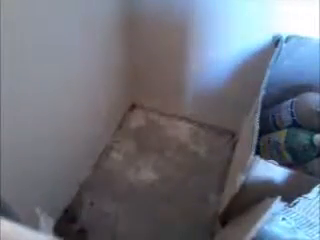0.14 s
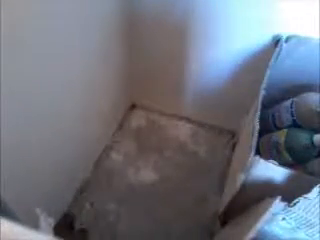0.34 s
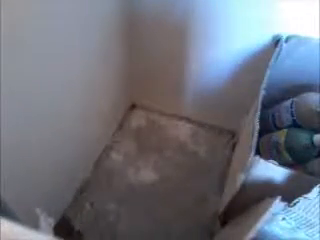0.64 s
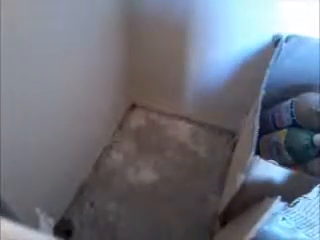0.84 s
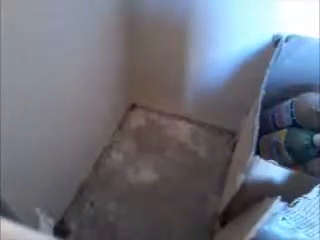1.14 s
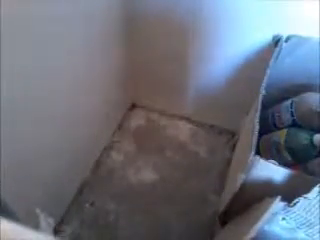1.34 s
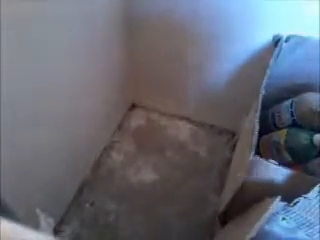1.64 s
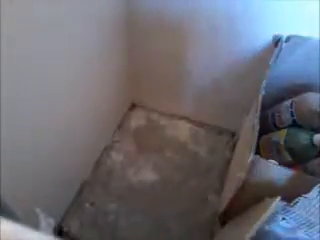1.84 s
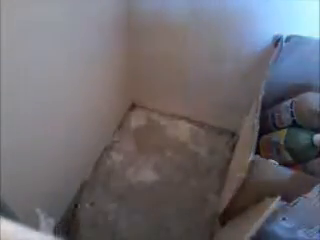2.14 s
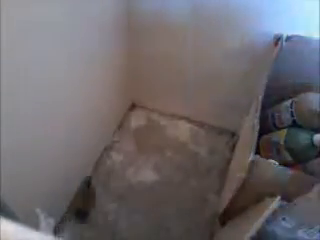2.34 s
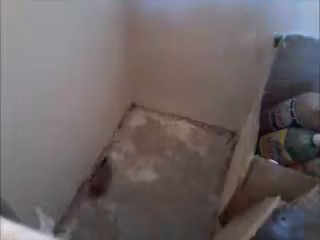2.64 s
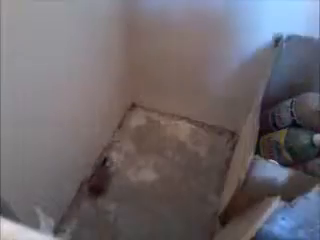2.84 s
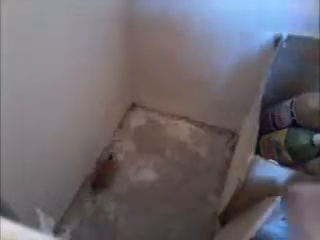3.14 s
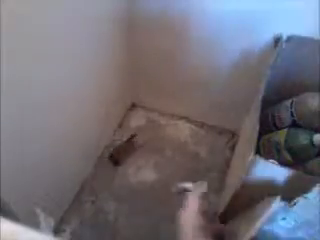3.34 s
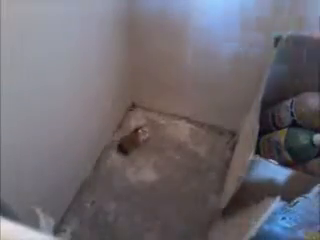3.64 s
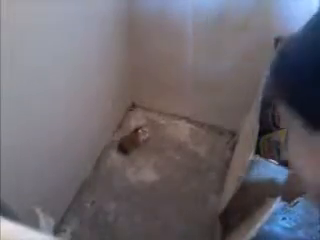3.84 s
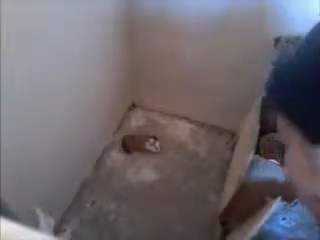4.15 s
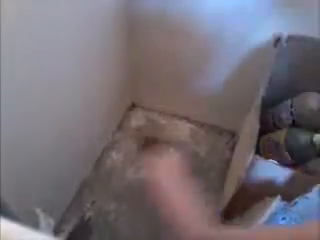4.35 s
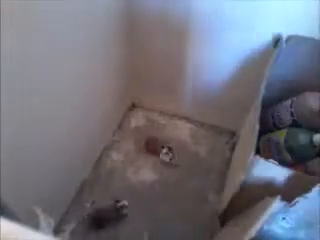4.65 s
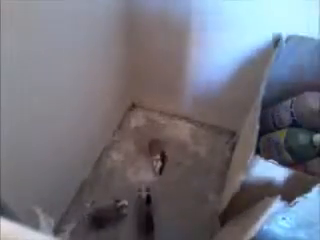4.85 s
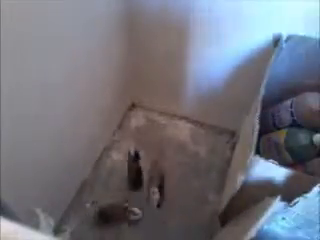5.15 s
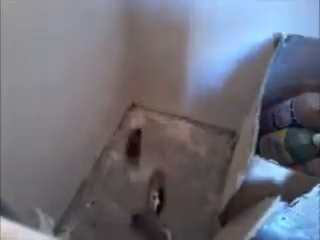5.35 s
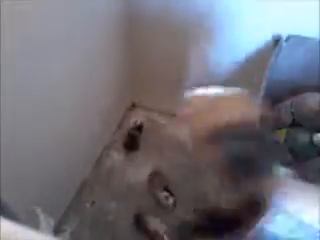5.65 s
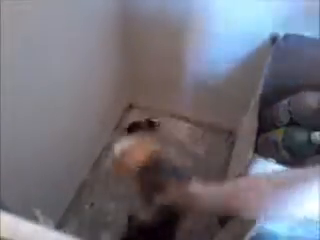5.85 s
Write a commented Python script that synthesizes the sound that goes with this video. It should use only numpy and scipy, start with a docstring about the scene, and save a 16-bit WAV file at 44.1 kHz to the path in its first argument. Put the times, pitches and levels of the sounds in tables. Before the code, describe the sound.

A small bare pen with hard walls, heard through a cheap, uneven microphone with soft air hiss. In the first 1.7 seconds young guinea pigs give faint thin peeps and short chirps around 1 kHz, with light grainy scuffs and soft low bumps. From about 1.8 seconds the chirps come in quick succession, each flipping up into a little whistle, with a bright burst of rustle near 2.25. Around 2.9, 3.25 and 3.45 seconds three shrill squeals sweep steeply up to about 7 kHz, by far the loudest sounds, slightly distorted and ringing off the walls. A few chirps follow until 3.9. A distant motor, emerging from about 2.7 seconds, now stands out as a drone with a rapid throb, under sparse weak peeps near 4.1 to 4.4. From 5.3 seconds handling rustles and scuffs return with blips near 5.5, and a sharp cardboard click lands at 5.8.

```python
"""A bare concrete pen with hard walls, young guinea pigs calling; thin peeps and quick blips, faint to loud.
Calls are stacks of unsteady partials: chirps near 1 kHz, rising whistles, glides that end in loud squeals.
Scuffs and breathy rushes are swells of noise grains; clicks ring cardboard modes; low noise bumps; air hisses.
From the middle on a distant motor drones, and a fast throb of noise puffs rings a pipe.
Dense wall echoes follow the calls and taps; a small, uneven microphone bends the loudest squeals."""
import sys
import numpy as np
from scipy import signal
from scipy.fft import rfft, irfft
from scipy.io import wavfile
from scipy.ndimage import uniform_filter1d

SR = 44100
rng = np.random.default_rng(int(sys.argv[2]) if len(sys.argv) > 2 else 0)


def transcribe(signal):
    """Save signal, clipped to [-1, 1], as a 16-bit WAV file at the path in sys.argv[1]."""
    frames = np.atleast_2d(signal).T
    limited = np.clip(frames, -1, 1)
    pcm = np.round(limited * 32767).astype(np.int16)
    wavfile.write(sys.argv[1], SR, pcm)


N = 263718
TIME = np.arange(N) / SR  # s

# flat chirps, before the colour by frequency is applied: # t/s, length/s, start f/Hz, end f/Hz, fundamental
# level/dB, second partial level/dB
CHIRPS = [(0.0, 0.015, 1057, 1093, -42.5, -50.5), (0.25, 0.032, 1120, 1083, -53, -70),
          (0.808, 0.028, 840, 870, -59, -69), (0.846, 0.033, 943, 987, -47, -56.5),
          (1.118, 0.068, 799, 1116, -56, -55.5), (1.223, 0.03, 926, 969, -48, -57),
          (1.334, 0.043, 955, 1050, -54, -52), (1.425, 0.032, 973, 1032, -48.5, -51.5),
          (1.477, .027, 1160, 1160, -52.5, -67), (1.521, .04, 936, 1000, -47, -51.5),
          (1.761, 0.0376, 1414, 1540, -47, -64), (1.788, 0.039, 1156, 1157, -51.5, -61),
          (2.612, 0.046, 1074, 1201, -44.5, -48.5), (2.955, 0.023, 1137, 1204, -42, -53),
          (3.826, 0.04, 891, 956, -45.5, -56)]
# chirps that flip up into a whistle: t/s, flat length/s, start f/Hz, end f/Hz,
# fundamental level/dB, second partial level/dB, flip length/s, top f/Hz, flip level/dB
WHISTLES = [(1.855, 0.035, 1021, 1046, -49, -51, .046, 3430, -49.5),
            (1.965, .036, 1009, 982, -44.5, -49, 0.084, 5680, -50),
            (2.12, .032, 1206, 1126, -40.5, -45.5, .058, 4086, -40),
            (2.225, 0.067, 990, 1240, -44.5, -49.5, 0.04, 3500, -43),
            (2.322, 0.019, 1014, 1060, -44.5, -49, 0.016, 1700, -48),
            (2.38, 0.059, 980, 1195, -44, -47, 0.02, 2410, -48),
            (2.5, 0.036, 1084, 1194, -41.5, -44.5, 0.017, 1540, -53),
            (2.709, .036, 1155, 1226, -42, -47, 0.023, 2294, -41),
            (3.01, .036, 916, 966, -43.5, -48.5, 0.0216, 1540, -41),
            (3.339, 0.022, 1047, 1130, -42, -40, .02, 2100, -32.5),
            (3.556, 0.037, 957, 1014, -35.5, -43.5, 0.0242, 1300, -41),
            (3.675, 0.034, 932, 958, -43, -48, .028, 1115, -39)]
# loud squeals, one table a call: t/s, f/Hz, fundamental level/dB, second partial level/dB
SQUEALS = [
    [(2.83, 1017, -38.5, -37), (2.845, 1288, -42.5, -50.5), (2.86, 2855, -35.5, -56),
     (2.876, 4520, -45, -45.5), (2.896, 5620, -34, -37.5), (2.92, 5970, -30, -52),
     (2.932, 6480, -11.5, -32.5), (2.943, 6800, -26, -29), (2.956, 7050, -33, -44)],
    [(3.158, 1020, -42, -65), (3.185, 1576, -39, -42), (3.205, 2650, -39, -51.5), (3.225, 3690, -39.5, -33),
     (3.247, 5050, -32, -27.5), (3.259, 6076, -20, -18), (3.268, 6840, -11, -13), (3.282, 6930, -13, -23.5),
     (3.3, 7000, -12, -42.5)],
    [(3.38, 1900, -54, -51), (3.397, 2718, -40, -44.5), (3.41, 3240, -37, -35), (3.431, 4300, -35.5, -29.5),
     (3.448, 5390, -29.5, -25), (3.462, 6180, -17, -20), (3.476, 6840, -12, -20), (3.488, 7104, -9, -9.5),
     (3.5, 7108, -12.5, -25), (3.514, 7120, -11, -53.5)],
]
# colour each partial takes from its frequency: f/Hz, level/dB
PARTIAL_COLOUR = [(900, 0.5), (2000, -1), (3300, -3.5), (4600, 2), (5400, 0), (6200, 3), (7200, -1),
                  (9500, -0.5), (13500, 1), (16000, -3)]
# thin peeps and quick, mostly upward blips without overtones, faint to loud:
# t/s, length/s, start f/Hz, end f/Hz, level/dB
PEEPS = [(0.032, 0.027, 1523, 1830, -56.5), (0.083, 0.014, 730, 740, -56), (0.177, .025, 1190, 1220, -63.5),
         (0.336, 0.037, 790, 900, -60), (0.343, .025, 1500, 1440, -55.5), (.13, .025, 2130, 2140, -63),
         (.373, 0.031, 2110, 2100, -68), (.43, .045, 2020, 2060, -66), (0.474, 0.053, 2040, 2080, -68),
         (0.523, .035, 2040, 2060, -63), (0.406, 0.021, 800, 770, -57), (.61, .037, 1565, 1470, -59),
         (.73, .046, 1610, 1880, -60.5), (0.457, .025, 1620, 1840, -60.5), (.695, 0.03, 1150, 1150, -57.5),
         (0.971, 0.022, 740, 770, -59), (1.047, 0.015, 1190, 1200, -58), (1.475, 0.017, 2540, 2870, -54),
         (2.668, 0.013, 1750, 1970, -42), (2.698, .018, 1700, 1630, -52), (2.786, .016, 1310, 2160, -39),
         (2.81, 0.064, 3590, 3620, -55), (2.856, 0.029, 1196, 2210, -47.5), (3.194, 0.047, 1580, 1663, -45),
         (3.449, 0.018, 1394, 2520, -28), (3.482, .011, 3750, 3500, -40), (3.541, 0.015, 1425, 2170, -38),
         (3.696, 0.014, 2330, 2610, -47), (4.055, .021, 1274, 1406, -52.5),
         (4.111, 0.041, 1650, 1878, -48.5), (4.219, 0.021, 1870, 2014, -47),
         (4.378, 0.036, 1015, 1025, -49), (5.02, 0.023, 1750, 1796, -51.5), (3.715, 0.025, 1996, 2070, -49),
         (3.93, 0.11, 1500, 1478, -58), (5.485, 0.03, 1526, 1920, -49), (5.519, 0.036, 2370, 3200, -46.5),
         (5.555, .019, 1800, 2290, -65)]
# scuffs, and breathy rushes around the squeals: t/s, bright hiss level/dB, dull scrape level/dB, t60/s
SCUFFS_AND_RUSHES = [(.04, -82, -56.5, 0.088), (.2, -51.5, -78, .14), (.26, -77, -61, 0.071),
                     (.335, -79, -53, .12), (.63, -80, -54, 0.86), (0.693, -49, -47.5, 0.21),
                     (.86, -56, -55, 0.17), (1.05, -80, -54.5, 0.19), (1.133, -44, -57, 0.33),
                     (1.225, -43.5, -59, 0.25), (1.388, -45.5, -51.5, 0.33), (1.48, -67, -52, 0.26),
                     (1.7, -54, -63, 0.45), (1.925, -41.5, -52, .38), (2.025, -48.5, -48.5, 0.56),
                     (2.175, -61, -48.5, 0.68), (2.237, -30, -52, 0.23), (2.36, -52.5, -49, 0.95),
                     (2.42, -68, -45, 0.31), (2.52, -56, -51, 0.13), (2.556, -55, -55, 0.27),
                     (2.597, -42.5, -48, 0.32), (2.662, -69, -46, 0.18), (2.732, -53, -45, .6),
                     (2.832, -45, -45, 0.12), (2.905, -39.5, -49, 0.44), (2.963, -39.5, -44, 0.29),
                     (3.082, -46, -72, 0.21), (3.155, -42, -41, 1), (3.315, -44.5, -62.5, .3),
                     (3.345, -39.5, -37, 0.68), (3.529, -48, -38.5, 0.84), (3.6, -43, -56, 0.36),
                     (3.72, -52, -50.5, 1), (4.63, -59, -76, 0.18), (4.89, -51, -72, 0.39),
                     (4.983, -53.5, -51.5, .15), (5.16, -54, -52, .1), (5.288, -36, -43.5, 0.49),
                     (5.352, -33, -61, 0.21), (5.465, -44.5, -45, 0.84), (5.508, -43, -43.5, .56),
                     (5.716, -51.5, -69.5, 0.66), (5.795, -41.5, -43, 0.79), (5.867, -53, -44.5, 0.54)]
# relative spectrum of the bright hiss: f/Hz, level/dB per Hz
BRIGHT_SPECTRUM = [(1500, -29.5), (2500, -6.5), (3600, -8), (6000, -2.5), (8200, -3), (10500, -2),
                   (12000, -2), (13600, 3.5), (14600, 1.5), (15700, -8.5)]
# relative spectrum of the dull scrape: f/Hz, level/dB per Hz
DULL_SPECTRUM = [(88, -63), (150, -43), (300, -26.5), (367, -33), (899, -3), (1070, -4.5), (1500, -1),
                 (6000, -15), (7800, -30), (13200, -120)]
# claw or knuckle on cardboard: t/s, blow level/dB
TAPS = [(5.7938, -34.5), (5.7958, -27), (5.816, -44)]
# modes of the cardboard: f/Hz, level/dB, t60/s
CARDBOARD_MODES = [(505, -13, 0.065), (900, -7, 0.0084), (1700, 1.5, 0.0087), (2820, -1, 0.0055),
                   (3980, 10.5, 0.0027), (5830, -17, 0.0037), (7700, -7, .004), (11400, -4, .004)]
# low bumps, perhaps a hand on the recorder: t/s, level/dB
BUMPS = [(.1, -67), (.3, -63.5), (.62, -59), (.78, -70), (.93, -60.5), (3.62, -61), (5.31, -62),
         (5.52, -63), (5.61, -61.5), (5.8, -58.5), (5.87, -68)]
# course of the motor: t/s, drone level/dB, throb level/dB
MOTOR_LEVELS = [(2.7, -65, -68), (2.97, -51, -55.5), (3.25, -53.5, -64.5), (3.65, -50, -54.5),
                (3.9, -51, -55), (4.1, -44.5, -54), (4.35, -44.5, -48.5), (4.8, -47, -50.5),
                (5.03, -47, -53.5), (5.22, -48, -49.5), (5.32, -45, -59.5), (5.98, -45.5, -60.5)]
# relative spectrum of the motor drone: f/Hz, level/dB per Hz
DRONE_SPECTRUM = [(120, -101), (200, -44), (423, -33), (473, -10), (600, -14), (682, -5), (839, -12),
                  (908, -5.5), (1120, -12), (1890, -11), (2480, -12.5), (3570, -24.5), (9000, -35.5),
                  (11700, -39), (19800, -120)]
# pipe resonances rung by each throb: f/Hz, width/Hz, relative level/dB
PIPE_MODES = [(693.4, 41, 1.5), (475, 24, -16.5), (1000, 120, -11.5), (1485, 60, -14), (2303, 80, -13.5)]
# relative spectrum of the air noise: f/Hz, level/dB per Hz
AIR_SPECTRUM = [(15, -34.5), (25, -6), (49, -21.5), (126, -21), (435, -4), (1150, -2.5), (2080, -4),
                (3200, -11), (5190, -17), (6800, -12), (11700, -14), (13300, -7), (15700, -14.5)]
# decay of the late echoes: f/Hz, t60/s
PEN_T60 = [(500, 0.15), (1000, 0.26), (2000, .22), (4000, 0.17), (7000, 0.23), (14000, 0.15)]
# colour of the echoes, the open top lets the lows escape: f/Hz, relative level/dB
PEN_COLOUR = [(500, -7.5), (1000, -3), (2000, 0), (4000, 1.5), (16000, -1)]

# chirps: full level begins and ends at these shares of the length; level at both ends; steepening power
SWELL_SHARE, HOLD_SHARE, START_DB, END_DB, GLIDE_POWER = 0.27, 0.79, -14.5, -3, 1.207
# flip: powers that gather speed and slow toward the top; second partial and end, below the flip level
FLIP_ONSET, FLIP_EASE, FLIP_SECOND_DB, FLIP_END_DB = 1.4, 2.2, -11.5, -5
UPPER_FALL_DB = 7.5  # each partial above the second is this much weaker
WOBBLE, GLIDE_WOBBLE = 0.00744, 0.05  # pitch unrest (share): always; extra in low fast glides
FADE_S = 0.0036  # soft ends of a call
# slow and fast flutter of the air stream, fading as the pitch passes CLEAR_HZ
BREATHY_DB, HOARSE_DB, CLEAR_HZ = -7, -10, 2500
RUSH_RISE_S, BUMP_T60_S = 0.018, 0.46
# moment of one throb, rate there, loss of rate each second
THROB_S, THROBS_PER_S, SLOWING_PER_S2 = 4.494, 30.55, 1.1
AIR_DB = -57
PEN_DB, FIRST_ECHO_S = -2.5, 0.0047
EARLY_DB, EARLY_T60_S = 0.5, 0.077  # extra early echoes, relative to the late ones, and their added decay
BEND, CEILING = 0.27, 1.02  # microphone: share of the sixth-power bend, rounding ceiling
CUTOFF_HZ = 15770  # steep low-pass: nothing sounds above


def voices():
    """Each call is five partials on an unsteady pitch, coloured by their frequency; low fast glides break up."""
    out = np.zeros(N)
    calls = [chirp(*row, END_DB) for row in CHIRPS]
    calls += [whistle(*row) for row in WHISTLES] + SQUEALS
    for call in calls:
        s, hz, first_db, second_db = np.transpose(call)
        start = int(s[0] * SR)
        t = TIME[start:int((s[-1] + FADE_S) * SR)]
        aim = np.interp(t, s, hz)
        octaves_per_s = uniform_filter1d(abs(np.gradient(np.log2(aim))) * SR, size=200)
        glide = np.clip(octaves_per_s / 40, 0, 1) / np.hypot(1, (aim / 3500) ** 2)
        unrest = WOBBLE * drift(71.5, len(t)) + GLIDE_WOBBLE * glide * drift(300, len(t))
        pitch = aim * (1 + unrest)
        for k in range(1, 6):
            partial_db = first_db if k == 1 else second_db - UPPER_FALL_DB * (k - 2)
            level_db = np.interp(t, s, partial_db) + at_hz(PARTIAL_COLOUR, k * pitch)
            out[start:][:len(t)] += soft_ends(t) * partial(pitch, level_db, k)
    return out


def whistle(s, length, from_hz, to_hz, first_db, second_db, flip_s, top_hz, flip_db):
    """A chirp that does not fade but leaps up, slowing toward the top."""
    rows = chirp(s, length, from_hz, to_hz, first_db, second_db, 0)
    for x in np.arange(1, 7) / 6:
        hz = top_hz - (top_hz - to_hz) * (1 - x ** FLIP_ONSET) ** FLIP_EASE
        db = flip_db + FLIP_END_DB * x ** 4
        rows.append((s + length + x * flip_s, hz, db, db + FLIP_SECOND_DB))
    return rows


def chirp(s, length, from_hz, to_hz, first_db, second_db, end_db):
    """Swell, hold and fade on a glide that steepens: rows of t/s, f/Hz, level/dB, level/dB."""
    shape = [(0, START_DB), (SWELL_SHARE, 0), (HOLD_SHARE, 0), (1, end_db)]
    return [(s + x * length, from_hz + x ** GLIDE_POWER * (to_hz - from_hz), first_db + db, second_db + db)
            for x, db in shape]


def partial(pitch, level_db, k):
    """One partial; air-stream flutter spreads a noisy skirt around its line, hoarsest in low tones."""
    low_pass = signal.butter(4, 450, fs=SR, output="sos")
    fast = signal.sosfilt(low_pass, rng.standard_normal(len(pitch) + 500))[500:]
    unrest = from_db(BREATHY_DB) * drift(91, len(pitch)) + from_db(HOARSE_DB) * rms_one(fast)
    flutter = 1 + unrest / np.hypot(1, pitch / CLEAR_HZ)
    tone = np.sin(2 * np.pi * k * np.cumsum(pitch) / SR)
    audible = k * pitch < .45 * SR  # stay below half the sample rate
    return np.sqrt(2) * from_db(level_db) * flutter * tone * audible


def soft_ends(t):
    """Fade a call in and out."""
    return np.clip(np.minimum(t - t[0], t[-1] - t) / FADE_S, 0, 1) ** 2


def peeps():
    """Single unsteady lines that glide from one pitch to another."""
    out = np.zeros(N)
    for s, length, from_hz, to_hz, db in PEEPS:
        t = TIME[int(s * SR):int((s + length) * SR)]
        pitch = np.linspace(from_hz, to_hz, len(t)) * (1 + .02 * drift(200, len(t)))
        out[int(s * SR):][:len(t)] += soft_ends(t) * partial(pitch, db, 1.0)
    return out


def scuffs_and_rushes():
    """Dense noise grains under a swell and a decay: bright hiss and dull scrape."""
    bright_power, dull_power = np.zeros(N), np.zeros(N)
    for s, bright_db, dull_db, t60 in SCUFFS_AND_RUSHES:
        age = np.clip(TIME - s, 0, None)
        swell = np.sin(np.pi / 2 * np.clip(age / RUSH_RISE_S, 0, 1)) ** 2
        shape = swell * from_db(-60 * np.clip(age - RUSH_RISE_S, 0, None) / t60)
        bright_power += (from_db(bright_db) * shape) ** 2
        dull_power += (from_db(dull_db) * shape) ** 2
    # random level makes the noise grainy
    bright_grains = rng.standard_normal(N) * from_db(1.2 * drift(300, N))
    dull_grains = rng.standard_normal(N) * from_db(2.8 * drift(89.0, N))
    bright = np.sqrt(bright_power) * coloured(bright_grains, BRIGHT_SPECTRUM)
    return bright + np.sqrt(dull_power) * coloured(dull_grains, DULL_SPECTRUM)


def taps():
    """Short blows into the modes of the cardboard, which radiates no bass."""
    clicks = np.zeros(N)
    for s, db in TAPS:
        clicks[round(s * SR)] = from_db(db)
    rung = sum(from_db(db) * ring(clicks, hz, t60) for hz, db, t60 in CARDBOARD_MODES)
    return signal.sosfilt(signal.butter(3, 280, "high", fs=SR, output="sos"), rung)


def bumps():
    """Low noise that swells fast and dies."""
    power = np.zeros(N)
    for s, db in BUMPS:
        rise = np.clip((TIME - s) / 0.017, 0, 1)
        power += (rise * from_db(db - 60 * np.clip(TIME - s, 0, None) / BUMP_T60_S)) ** 2
    band = signal.butter(2, [200, 480], "band", fs=SR, output="sos")
    return np.sqrt(power) * rms_one(signal.sosfilt(band, rng.standard_normal(N)))


def motor():
    """A broad drone plus one puff of noise per turn that rings a pipe."""
    s, *columns = np.transpose(MOTOR_LEVELS)
    drone_db, throb_db = [np.interp(TIME, s, c) for c in columns]
    start = np.clip((TIME - s[0]) / 0.27, 0, 1) ** 2
    since = TIME - THROB_S
    turn = 2 * np.pi * since * (THROBS_PER_S - SLOWING_PER_S2 * since / 2)  # phase in radians
    puff = np.exp(4.0 * (np.cos(turn) - 1)) * from_db(1.2 * drift(15, N))
    throb = np.zeros(N)
    for hz, width_hz, db in PIPE_MODES:
        tone = np.sin(2 * np.pi * hz * TIME + 1.73 * drift(3.1, N))  # wandering phase
        drive = puff * (tone + .35 * rng.standard_normal(N))
        t60 = np.log(1000) / (np.pi * width_hz)
        throb += from_db(db) * rms_one(ring(drive, hz, t60))
    drone = patchy(DRONE_SPECTRUM, patchy_db=1.66, rate_hz=8.5) * (1 + 0.15 * np.cos(turn))
    return start * (from_db(drone_db) * drone + from_db(throb_db) * rms_one(throb))


def air():
    """Continuous air noise whose octave bands flicker."""
    return from_db(AIR_DB) * patchy(AIR_SPECTRUM, patchy_db=2.34, rate_hz=13.7)


def pen(x):
    """Dense echoes of bare walls: noise dying band by band; the near walls answer first and loudest."""
    t = TIME[:SR // 2]
    hz = np.clip(np.fft.rfftfreq(len(t), 1 / SR), 250, 16000)
    white, tail = rfft(rng.standard_normal(len(t))), np.zeros(len(t))
    for centre in 250 * 2. ** np.arange(7):
        band = irfft(white * octave_share(hz, centre), len(t))
        tail += band * from_db(at_hz(PEN_COLOUR, centre) - 60 * t / at_hz(PEN_T60, centre))
    early = from_db(EARLY_DB - 60 * t / EARLY_T60_S)
    tail = tail * (t > FIRST_ECHO_S) * (1 + early)
    return from_db(PEN_DB) * signal.fftconvolve(x, tail / np.sqrt(np.sum(tail ** 2)))[:N]


def from_db(db):
    """Decibels to gain."""
    return 10 ** (np.asarray(db) / 20)


def rms_one(x):
    """Scale to rms 1."""
    return x / np.sqrt(np.mean(x ** 2) + 1e-20)


def at_hz(points, hz):
    """Read a table on a log-frequency axis."""
    table_hz, value = np.array(points).T
    return np.interp(np.log(hz), np.log(table_hz), value)


def drift(rate_hz, size):
    """Random wander of rms 1: noise through two equal one-pole low-passes."""
    r = np.exp(-2 * np.pi * rate_hz / SR)
    white = rng.standard_normal(size + 4000)
    return rms_one(signal.lfilter([1], [1, -2 * r, r * r], white)[4000:])  # skip the filter's start


def coloured(white, spectrum):
    """Give a noise its spectrum; rms 1."""
    hz = np.maximum(np.fft.rfftfreq(N, 1 / SR), 1)
    return rms_one(irfft(rfft(white) * from_db(at_hz(spectrum, hz)), N))


def octave_share(hz, centre):
    """Share of each frequency in an octave band, sloping to 0 one octave from its centre."""
    return np.clip(1 - abs(np.log2(hz / centre)), 0, 1)


def patchy(spectrum, patchy_db, rate_hz):
    """Noise whose octave bands flicker partly together, partly alone; rms 1."""
    full = rfft(coloured(rng.standard_normal(N), spectrum))
    hz = np.maximum(np.fft.rfftfreq(N, 1 / SR), 40)
    together, out = drift(rate_hz / 4, N), np.zeros(N)
    for centre in 40 * 2. ** np.arange(10):
        band = irfft(full * octave_share(hz, centre), N)
        out += band * from_db(patchy_db * (together + drift(rate_hz, N)))
    return rms_one(out)


def ring(clicks, hz, t60):
    """A unit click sets a decaying sine of starting height 1 ringing in a two-pole resonator."""
    r, w = from_db(-60 / (t60 * SR)), 2 * np.pi * hz / SR
    return signal.lfilter([0, np.sin(w)], [1, -2 * r * np.cos(w), r * r], clicks + 1e-18)


def scene():
    """Calls and peeps echo in the pen, the close taps less; motor and air noise are already diffuse."""
    no_bass = signal.butter(4, 600, "high", fs=SR, output="sos")  # small throats give no bass
    calls = signal.sosfilt(no_bass, voices() + peeps())
    tap = taps()
    echoes = pen(calls + 0.4 * tap)
    return (calls + tap + echoes + scuffs_and_rushes() + bumps() + motor() + air())[None]


def record(dry):
    """The uneven microphone bends the loudest squeals into low thumps and rounds peaks; a steep low-pass follows."""
    thump = signal.sosfilt(signal.butter(2, 80, "high", fs=SR, output="sos"), np.tanh(dry) ** 6)
    bent = CEILING * np.tanh((dry + BEND * thump) / CEILING)
    return signal.sosfilt(signal.ellip(12, .5, 75, CUTOFF_HZ, fs=SR, output="sos"), bent)


dry = scene()
out = record(dry)
transcribe(out)
```